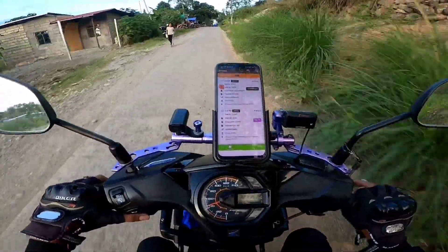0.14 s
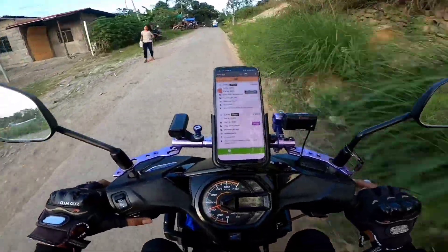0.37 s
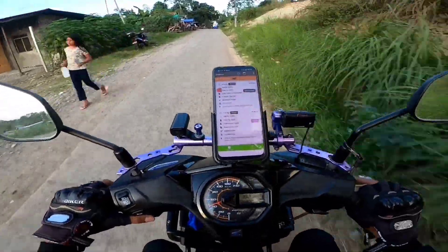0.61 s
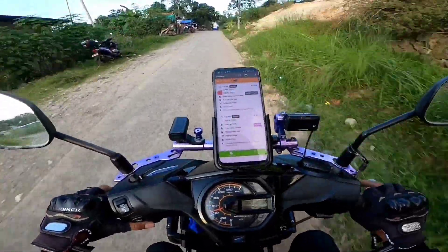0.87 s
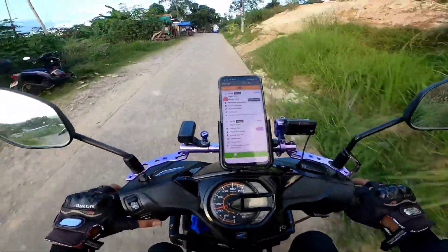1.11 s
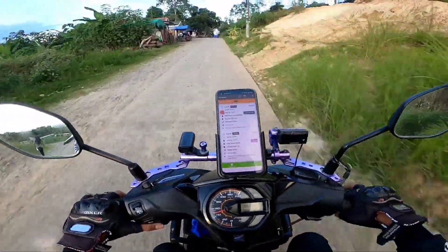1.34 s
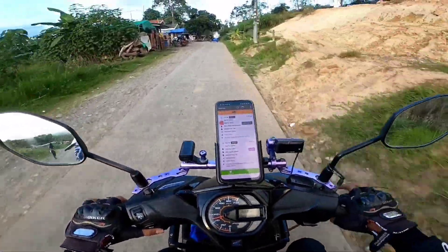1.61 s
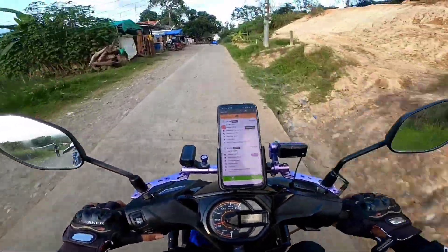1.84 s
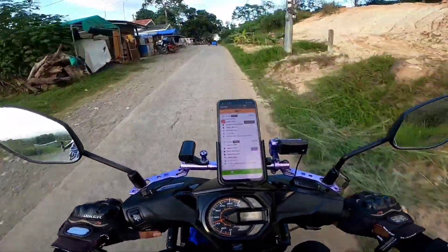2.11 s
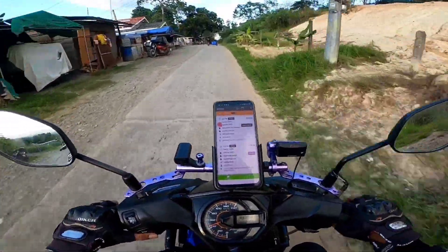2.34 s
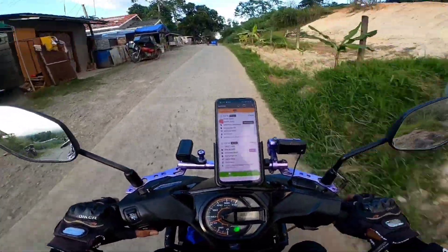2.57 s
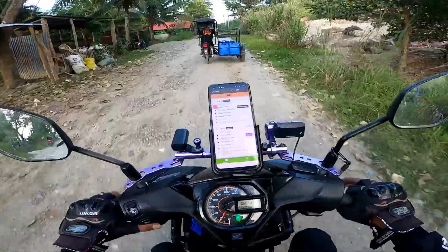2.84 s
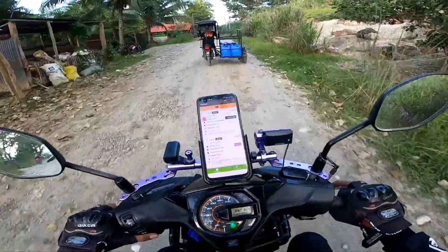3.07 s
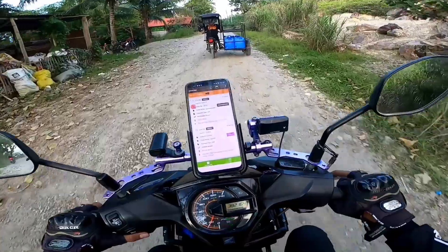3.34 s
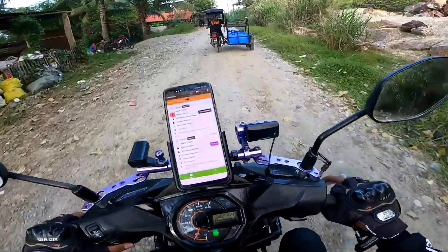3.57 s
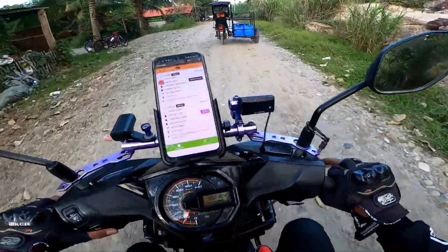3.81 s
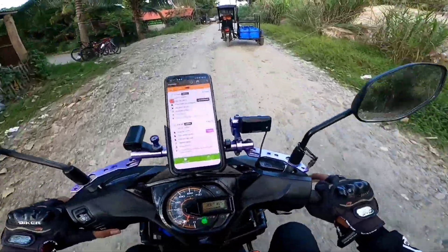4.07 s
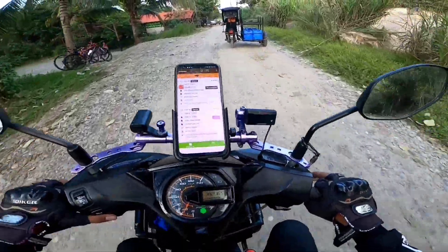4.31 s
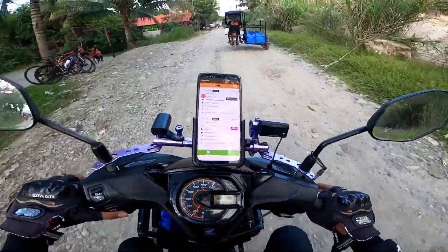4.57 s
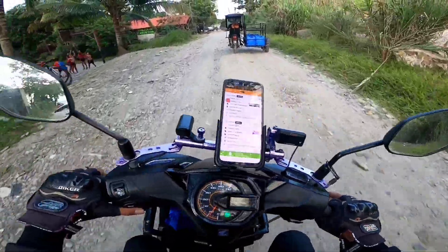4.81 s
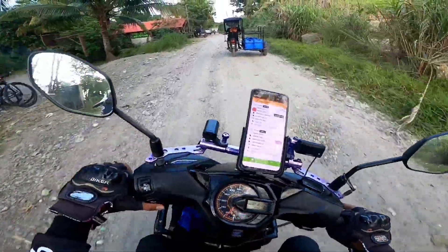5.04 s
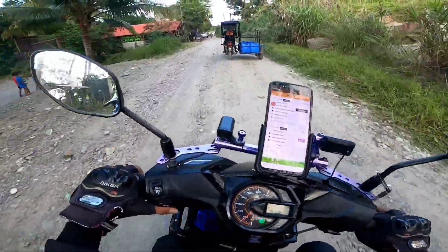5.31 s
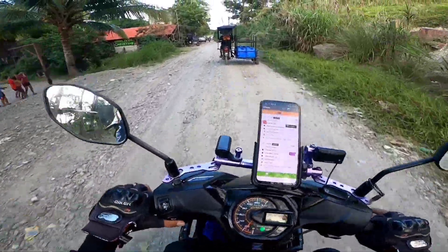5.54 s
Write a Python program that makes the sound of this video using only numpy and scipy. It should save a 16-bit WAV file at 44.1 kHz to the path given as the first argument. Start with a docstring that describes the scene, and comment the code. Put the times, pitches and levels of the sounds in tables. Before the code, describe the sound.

A scooter engine hums at cruising speed in buffeting wind, then slows with brake scrape and squeal and crawls over loose, crunching gravel, left channel only.

```python
"""A scooter engine hums at cruising speed under buffeting wind, heard from the saddle on the left side.
The throttle shuts, the brake scrapes, squeals and squeaks, and the scooter pulls slowly over loose gravel.
The engine is a stack of tones locked to its firings; wind, body roar, tyres and gravel are shaped noise.
Stones, a clink and thumps are short ringing tones; scuffs are bursts of noise.
The right side carries only the preamplifier's hiss."""
import sys
import numpy as np
from scipy import signal
from scipy.io import wavfile
from scipy.ndimage import uniform_filter1d

SR = 44100
rng = np.random.default_rng(int(sys.argv[2]) if len(sys.argv) > 2 else 0)


def int16_out(signal):
    """Quantize to a 16-bit WAV file."""
    q = np.round(np.clip(np.atleast_2d(signal).T, -1, 1) * 32767)
    wavfile.write(sys.argv[1], SR, q.astype(np.int16))


def decibels_to_gain(level_db):
    """Convert a level in decibels to a linear amplitude gain (20 dB per decade)."""
    exponent = np.asarray(level_db, float) / 20
    return 10 ** exponent


N = 250047  # length in samples
T = np.arange(N) / SR  # time in seconds
# The sources' levels in dB count before scene() doubles their sum.
LOOSE_FROM_S = 3.1  # the road turns to loose gravel
BLOW_S = .0006  # contact time of a stone of plain brightness; harder blows are shorter


def follow(rows):
    """Joins the points of a two-column curve (seconds, value) with straight lines."""
    s, value = np.transpose(rows)
    return np.interp(T, s, value)


def evened(x):
    """Scales to rms 1."""
    return x / np.sqrt(np.mean(x ** 2) + 1e-20)


def swells(rows):
    """Bell-shaped changes in dB, each as wide as its length where it is down to 1/e of its height."""
    return sum(db * np.exp(-(2 * (T - s) / length) ** 2) for s, db, length in rows)


def peaked(s, peak_db, rise_db, fall_db):
    """A straight rise and fall about one peak, in dB per second."""
    return peak_db - rise_db * np.maximum(s - T, 0) - fall_db * np.maximum(T - s, 0)


def drift(hz):
    """Slow random wandering of rms 1, mostly below hz."""
    knots = rng.standard_normal(int(40 * N / SR) + 2)
    path = np.interp(T * 40, np.arange(len(knots)), knots)
    return evened(signal.sosfilt(signal.butter(2, hz, fs=SR, output="sos"), path))


def noise(shape, patchy_db, flicker_db, size=1024):
    """Noise of rms 1 from random short spectra, with drifting patches and a flicker shared by all pitches."""
    hz = np.fft.rfftfreq(size, 1 / SR)
    frames = 4 * N // size + 5
    real, imaginary, patches = rng.standard_normal((frames, len(hz), 3)).T
    patches = uniform_filter1d(patches, size=10, axis=0)
    patches = evened(uniform_filter1d(patches, size=8, axis=1))
    flicker = evened(uniform_filter1d(rng.standard_normal(frames), size=3))
    shape_hz, shape_db = np.transpose(shape)
    slope_db = np.interp(np.log(hz + 1), np.log(shape_hz), shape_db, left=-60, right=-90)
    level_db = slope_db[:, None] + patchy_db * patches + flicker_db * flicker
    spectra = (real + 1j * imaginary) * decibels_to_gain(level_db)
    return evened(signal.istft(spectra, nperseg=size, noverlap=3 * size // 4)[1][:N])


def whistle(hz, width):
    """Noise through the same resonance twice, rms 1; hz may move."""
    r = np.exp(-np.pi * width / SR)
    turn = np.exp(2j * np.pi * np.cumsum(hz * np.ones(N)) / SR)
    # filter around 0 Hz, then shift back up to the wanted pitch
    slow = signal.lfilter([1], np.convolve([1, -r], [1, -r]), rng.standard_normal(N) / turn)
    return evened((slow * turn).real)


def whistles(bands):
    """Several noise resonances (Hz, width in Hz, dB) together, rms 1."""
    return evened(sum(decibels_to_gain(db) * whistle(hz, width) for hz, width, db in bands))


def ring(modes, pitch, bright_db=0):
    """Decaying tones after one blow, peak 1; a harder blow is shorter and favours tones above 1 kHz."""
    t = T[:1500]
    out = np.zeros(len(t))
    for hz, db, t60 in modes:
        mode_db = db + bright_db * max(np.log2(hz / 1000), 0)
        out += decibels_to_gain(mode_db - 60 * t / t60) * np.sin(2 * np.pi * hz * pitch * t)
    out *= (1 - np.exp(-t * decibels_to_gain(bright_db / 2) / BLOW_S)) ** 2
    return out / abs(out).max()


def add(mix, s, sound):
    """Mixes a sound in at time s."""
    part = mix[round(s * SR):][:len(sound)]
    part += sound[:len(part)]


def ridden(level_db, slope, waver_db):
    """Level in dB that follows the road speed and wavers at random."""
    # Road speed as heard. Each row: time in seconds, dB relative to cruising.
    pace = [(0, -3.5), (.6, -0.1), (1.2, 2.4), (2.1, 0.4), (2.5, -1), (2.95, -2), (3.1, -7.5), (3.65, -9),
            (4.05, -9), (4.4, -7), (4.7, -6.5), (5.67, -6.5)]
    return level_db + slope * follow(pace) + waver_db * drift(17.0)


def preamp_hiss():
    """Separate preamplifier noise on each side, creeping up toward a plateau."""
    # Colour of the hiss. Each row: frequency in Hz, relative level in dB per Hz.
    hiss_shape = [(20, 19), (50, 13), (150, 9), (500, 4), (1000, 1), (2200, 0), (2900, 3), (4000, 0.5),
                  (8000, -.5), (15600, -2)]
    hiss = np.array([noise(hiss_shape, patchy_db=1.5, flicker_db=.9) for side in range(2)])
    creep_db = 4.5 * (1 - np.exp(-T / 2.35))
    side_db = np.array([[2.5], [0]])  # left, right
    return decibels_to_gain(-65 + creep_db + side_db) * hiss


def wind():
    """Air buffeting the microphone: low noise that follows the road speed, with gusts and slight lulls."""
    # Colour of the wind. Each row: frequency in Hz, relative level in dB per Hz.
    wind_shape = [(15, -2), (35, -0.5), (62, -5), (95, -6.5), (160, -12.5), (300, -19.5), (600, -73)]
    # Gusts and slight lulls. Each row: middle in seconds, dB relative to the steady wind
    # (negative is a lull), length in seconds.
    gusts_and_lulls = [(.15, 4, 0.19), (.4, 5, 0.16), (.6, 1.5, 0.17), (.82, 4.5, 0.033), (.92, -1, 0.038),
                       (1.6, 5, 0.1), (1.75, 3.5, 0.18), (2.02, 5, 0.21), (2.3, 1, 0.11),
                       (2.57, 1.5, 0.093), (4.4, 10, 0.13), (5.44, -1, 0.082)]
    level_db = ridden(level_db=-29, slope=1.37, waver_db=1.8) + swells(gusts_and_lulls)
    return decibels_to_gain(level_db) * noise(wind_shape, patchy_db=0.5, flicker_db=1.5, size=2048)


def body_roar(beat_db, past_coasting):
    """Body noise that swells at each firing and bump; from the crawl onward its middle band stays thinner."""
    # Colour of the roar. Each row: frequency in Hz, relative level in dB per Hz.
    roar_shape = [(30, -20), (70, -12), (150, -8), (280, -7), (380, -6), (480, -10), (600, -19), (800, -36),
                  (1500, -60)]
    # Bumps that shake the body. Each row: middle in seconds, swell in dB, length in seconds.
    bumps = [(3.67, 5, 0.1), (3.75, 3.5, 0.13), (3.9, 4.5, 0.31), (4.3, 5.5, 0.39), (5.47, 4.5, 0.066)]
    level_db = ridden(level_db=-33, slope=0.46, waver_db=0.27) + swells(bumps)
    roar = decibels_to_gain(level_db + beat_db) * noise(roar_shape, patchy_db=1.74, flicker_db=-1.2)
    band = signal.sosfiltfilt(signal.butter(1, (410, 570), "band", fs=SR, output="sos"), roar)
    return roar - .3 * past_coasting * band


def tyres(beat_db):
    """Rolling noise that follows the road speed and swells at each firing."""
    # Colour of the tyres. Each row: frequency in Hz, relative level in dB per Hz.
    tyre_shape = [(300, -3.5), (650, -5), (780, -2), (930, 5.5), (1080, -3.5), (1200, -10), (1600, -8),
                  (1750, -28), (1900, -10), (2400, -19.5)]
    level_db = ridden(level_db=-41.5, slope=0.98, waver_db=0.89) + beat_db
    return decibels_to_gain(level_db) * noise(tyre_shape, patchy_db=1.05, flicker_db=0.5, size=512)


def gravel(beat_db):
    """Crunching noise, louder on the loose road, that swells half as much in dB at each firing."""
    # Colour of the gravel. Each row: frequency in Hz, relative level in dB per Hz.
    gravel_shape = [(1000, 5.5), (1500, 1.5), (1900, -1), (2300, -4), (2550, -2.5), (2720, 1.5), (2900, -3),
                    (3400, -6), (3900, -16), (4300, -15), (5500, -22), (8000, -30)]
    level_db = ridden(level_db=-50.5, slope=0.73, waver_db=0.98) + 4 * (T > LOOSE_FROM_S)
    return decibels_to_gain(level_db + beat_db / 2) * noise(gravel_shape, patchy_db=0.86, flicker_db=-0.45, size=512)


def stones():
    """Stones and bumps strike the frame, which rings briefly; loose gravel adds a random patter."""
    # Ringing tones of the frame. Each row: frequency in Hz before the knock's pitch factor,
    # relative level in dB, time to fall by 60 dB in seconds.
    frame_modes = [(450, -12, .014), (880, -8, .02), (1050, 0, .014), (1330, -4, .011), (1750, -8, .009),
                   (2200, -14, .007)]
    # Single knocks. Each row: time in seconds, peak in dB, pitch factor, brightness in dB per octave.
    knocks = [(0.406, -29, 0.89, -8), (0.52, -29.5, 1, -10), (0.901, -30.5, 1.05, -7),
              (1.371, -28, 0.87, 0), (2.651, -46, 0.46, 0), (2.827, -33, .9, 4), (3.0265, -29, 0.92, 3),
              (3.07, -38, .88, 3), (3.159, -38, 1.03, 0), (3.174, -34, 0.9, -3), (3.435, -38, 0.72, 0),
              (3.459, -30.5, 0.95, 3), (3.515, -42, 1.2, 7), (3.54, -33.5, 0.86, 0), (3.547, -33, 0.53, -4),
              (3.555, -39, 1.4, 10), (3.568, -32, 1.01, 3), (3.656, -39, 0.72, -5), (3.784, -34, 1.11, -6),
              (3.7935, -32, 0.96, -5), (3.81, -37, 1.22, -1), (3.865, -43, 1.2, 0), (4.087, -35.5, 1, 6),
              (4.16, -41, 0.94, -4), (4.283, -42, 1, -12), (4.322, -42, 0.9, -4), (4.368, -36, 0.93, -2),
              (4.375, -30.5, 0.95, 1), (4.383, -31, 0.9, 3), (4.43, -38, 1.15, 2), (4.469, -37, 0.92, -6),
              (4.48, -43, 1.3, -2), (4.619, -32.5, 1.18, -2), (4.707, -43, 0.97, -3), (5.021, -40, 1.1, 0),
              (5.191, -47, 1, 0), (5.214, -35, 1.1, 2), (5.455, -39, 1, -2), (5.469, -31.5, 1.07, -4),
              (5.494, -36, 1.03, 2), (5.523, -30, 0.49, -8), (5.534, -34, 0.37, -6),
              (5.567, -33.5, 1.03, -4)]
    out = np.zeros(N)
    for s, peak_db, pitch, bright_db in knocks:
        add(out, s - BLOW_S, -decibels_to_gain(peak_db) * ring(frame_modes, pitch, bright_db))
    loose_s = T[-1] - LOOSE_FROM_S
    rattles_per_s = 30
    for when, size, pitch, hard in rng.random((int(rattles_per_s * loose_s), 4)):
        size_db = -49 + 9 * size ** 2  # mostly small stones
        rattle = ring(frame_modes, .8 + .5 * pitch, 8 * hard - 2)
        add(out, LOOSE_FROM_S + when * loose_s, decibels_to_gain(size_db) * rattle)
    return out


def clink():
    """One stone rings on metal inside the loudest scuff."""
    # Ringing tones of the metal. Each row: frequency in Hz, relative level in dB,
    # time to fall by 60 dB in seconds.
    metal_modes = [(2480, -9, .012), (2720, 0, .012), (4400, -13, .008), (5000, -13, .008)]
    out = np.zeros(N)
    add(out, 3.724, decibels_to_gain(-31) * ring(metal_modes, 1, -12))
    return out


def thumps():
    """The suspension thumps: one low tone each, faded out within 34 ms."""
    # Each row: time in seconds, level in dB, pitch in Hz before the factor of 0.96 below.
    thump_rows = [(1.572, -19, 152), (3.758, -21, 178), (3.856, -27, 174), (5.504, -23, 111),
                  (5.635, -32, 99)]
    fade = np.hanning(3000)[1500:]
    out = np.zeros(N)
    for s, peak_db, hz in thump_rows:
        tone = ring([(hz, 0, 0.35)], 0.96)  # would fall by 60 dB in 0.35 s without the fade
        add(out, s, decibels_to_gain(peak_db) * tone * fade)
    return out


def scuffs():
    """Gravel scuffs the underside: rough noise that rises fast and dies away."""
    # Strokes. Each row: start in seconds, level in dB, rise in seconds, time to fall by 60 dB in seconds.
    strokes = [(3.529, -52, .005, .05), (3.7185, -40, 0.0044, 0.18), (4.665, -52, 0.0034, .1),
               (4.86, -54, 0.011, .15)]
    # Noise bands. Each row: frequency in Hz, width in Hz, relative level in dB.
    scuff_bands = [(1300, 900, -2), (2000, 700, -6), (2680, 600, -1), (3250, 600, -1), (4300, 500, -8),
                   (4950, 500, -10), (6500, 1500, -16), (8200, 1200, -17)]
    grit = whistles(scuff_bands)
    t = T[:6000]
    out = np.zeros(N)
    for s, db, rise, t60 in strokes:
        fall_db = 60 * np.maximum(t - rise, 0) / t60
        stroke = np.minimum(t / rise, 1) ** 2 * decibels_to_gain(db - fall_db)
        add(out, s, stroke * grit[round(s * SR):][:len(t)])
    return out


def brake_scrape():
    """The brake pad scrapes: a few noise bands that start suddenly, swell and fade."""
    # Each row: frequency in Hz, width in Hz, relative level in dB.
    scrape_bands = [(4300, 500, -4), (4900, 750, 1), (6100, 1000, -1), (11300, 2500, -9)]
    onset = np.clip((T - 2.17) / 0.048, 0, 1)
    return decibels_to_gain(peaked(2.5, peak_db=-58.5, rise_db=18, fall_db=70)) * onset * whistles(scrape_bands)


def brake_squeal():
    """The pad squeals: a wavering tone with breathy noise around it, sinking as the wheel slows."""
    peak_s = 2.765
    squeal_db = peaked(peak_s, peak_db=-53, rise_db=60, fall_db=85)
    squeal_hz = 2588 - 300 * (T - peak_s) + 9 * drift(25)
    tone = np.sqrt(2) * np.sin(2 * np.pi * np.cumsum(squeal_hz) / SR)
    breath = decibels_to_gain(squeal_db - 8) * whistle(squeal_hz, width=130)
    return decibels_to_gain(squeal_db + 1.2 * drift(30)) * tone + breath


def brake_chatter():
    """The dragging pad chatters: wavering noise near 6200 Hz, louder once the brake is released."""
    on_s, released_s = 3.1, 4.1
    chatter_db = -75.5 - 5.9 * (T < released_s) - 30.5 * (T < on_s)
    return decibels_to_gain(chatter_db + 2.9 * drift(17)) * whistle(6200, width=450)


def brake_squeaks():
    """Now and then the brake gives a short squeak, a tone of slightly falling pitch."""
    # Each row: time in seconds, peak in dB, approximate pitch in Hz.
    squeaks = [(2.9677, -57.5, 6050), (3.157, -59, 6200), (3.2191, -65, 6080), (3.469, -55.5, 6020),
               (3.5254, -61, 5990), (3.6142, -58.5, 6120), (3.687, -61, 6230), (3.895, -54, 6100),
               (4.3904, -62, 6220), (4.8489, -64, 6270), (5.2335, -63, 5950)]
    t = T[:800]
    out = np.zeros(N)
    for s, peak_db, hz in squeaks:
        glide = hz * (t + .6 * t * (.016 - t))  # turns so far
        squeak = signal.windows.tukey(len(t), .7) * np.sin(2 * np.pi * glide)
        add(out, s - .002, decibels_to_gain(peak_db) * squeak)
    return out


def throttle():
    """Shares of cruising, coasting, crawling and pulling; and how far the change out of coasting is done."""
    # Fades from one state to the next. Each row: start in seconds, length in seconds.
    fades = [(1.574, 0.1), (2.974, 0.096), (3.748, 0.316)]
    done = [1] + [np.clip((T - s) / length, 0, 1) for s, length in fades] + [0]
    past_coasting = done[2]  # goes from 0 to 1 and stays at 1 afterwards
    return [a - b for a, b in zip(done, done[1:])], past_coasting


def firing_turns(shares):
    """Firing cycles so far: engine speed added up, with slightly uneven firing."""
    # Engine speed. Each row: time in seconds, firings per second.
    engine_speed = [(0.0, 43.53), (0.5, 44.34), (1.0, 44.75), (1.2, 45.23), (1.47, 43.45), (1.58, 41.18),
                    (1.65, 37.12), (1.91, 34.22), (2.16, 34.0), (2.38, 32.32), (2.84, 31.62), (3.09, 28.95),
                    (3.3, 26.81), (3.6, 24.19), (3.8, 23.84), (4.02, 25.03), (4.34, 27.46), (4.55, 28.54),
                    (5.2, 29.51), (5.57, 28.82), (5.67, 28.07)]
    # How early the pulse comes in each throttle state, in turns of the firing cycle.
    lead_turns = (.45, .24, -.19, -.6)
    turns = np.cumsum(follow(engine_speed)) / SR + .003 * drift(12)
    return turns + sum(share * lead for share, lead in zip(shares, lead_turns))


def gear_whine(turns, shares):
    """Gear teeth under load whine at high multiples of the firing rate while cruising."""
    # Each row: multiple of the firing rate, level in dB.
    gear_teeth = [(11, -54), (17, -58), (21, -53), (23, -48.5), (35, -68), (42, -66)]
    whine = sum(decibels_to_gain(db + 2 * drift(12)) * np.cos(2 * np.pi * teeth * turns) for teeth, db in gear_teeth)
    return shares[0] * whine


def exhaust(turns, shares):
    """Tones at multiples of the firing rate, blended between four notes as the throttle changes."""
    # Level of the whole note. Each row: time in seconds, rms level in dB.
    exhaust_level = [(0, -28), (.6, -25), (1.3, -24.5), (1.47, -28), (1.67, -27), (1.9, -31.5), (2, -26),
                     (2.54, -26.5), (2.84, -26), (3.05, -35), (3.14, -28), (3.3, -27.5), (3.54, -31.5),
                     (3.65, -28), (3.8, -33), (4.03, -31.5), (4.8, -28.5), (5.45, -30), (5.67, -27.5)]
    # The four notes. Each row: multiple of the firing rate, relative level in dB.
    cruising = [(1, -7), (2, 0), (3, -5), (4, -18), (5, -11), (6, -6.5), (7, -8), (8, -16), (9, -21),
                (10, -26)]
    coasting = [(1, -8), (2, -10), (3, 0), (4, 0), (5, -9), (6, -9), (7, -16), (8, -15), (9, -18),
                (10, -19)]
    crawling = [(1, -15), (2, -12), (3, -2.5), (4, 0), (5, -6), (6, -9), (7, -15), (8, -18), (9, -21),
                (10, -23)]
    pulling = [(1, -7), (2, 0.5), (3, -10.5), (4, 0.5), (5, 1), (6, -5), (7, -10), (8, -7), (9, -16),
               (10, -8.5)]
    # The third multiple of the firing rate swells three times.
    # Each row: multiple of the firing rate, middle in seconds, rise in dB, length in seconds.
    tone_swells = [(3, 1.72, 6, 0.28), (3, 2.86, 4.5, 0.15), (3, 3.83, 4, .3)]
    # How far each note's pulse is drawn out, longer under load, in radians per order squared.
    pulse_spread = (.2, .14, .11, .27)
    notes = [decibels_to_gain(np.array(note)[:, 1]) for note in (cruising, coasting, crawling, pulling)]
    notes = [np.sqrt(2) * note / np.linalg.norm(note) for note in notes]  # each note has rms 1
    spread = sum(share * s for share, s in zip(shares, pulse_spread))
    tone = np.zeros(N)
    for k in range(len(cruising)):
        height = sum(share * note[k] for share, note in zip(shares, notes))
        swell_db = swells([row[1:] for row in tone_swells if row[0] == k + 1])
        lag = 2.5 * k - spread * k ** 2  # the pipe lets each pulse's sharp edge out before its boom
        wave = np.cos(2 * np.pi * (k + 1) * turns - lag)
        tone += height * decibels_to_gain(swell_db + 1.1 * drift(8)) * wave
    return decibels_to_gain(follow(exhaust_level)) * tone


def scene():
    """Everything reaches the one microphone on the left input; the right input is silent."""
    shares, past_coasting = throttle()
    turns = firing_turns(shares)
    beat_db = 1.4 * (np.cos(2 * np.pi * turns) + .4 * np.sin(4 * np.pi * turns))  # swell at each firing
    heard = wind() + body_roar(beat_db, past_coasting) + tyres(beat_db) + gravel(beat_db)
    heard += stones() + clink() + thumps() + scuffs()
    heard += brake_scrape() + brake_squeal() + brake_chatter() + brake_squeaks()
    heard += gear_whine(turns, shares) + exhaust(turns, shares)
    return np.array([2 * heard, np.zeros(N)])


def low_pass(x):
    """Removes everything above the highest recorded frequency."""
    return signal.sosfilt(signal.butter(12, 15510, fs=SR, output="sos"), x)


def record(dry):
    """The input flattens the loudest peaks and adds its own hiss on each side."""
    knee = 0.53  # the flattened peaks never pass this level
    wet = knee * np.tanh(dry / knee) + preamp_hiss()
    return low_pass(wet)


dry = scene()
out = record(dry)
int16_out(out)
```